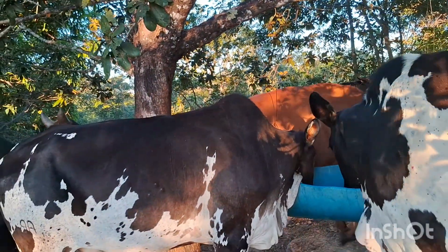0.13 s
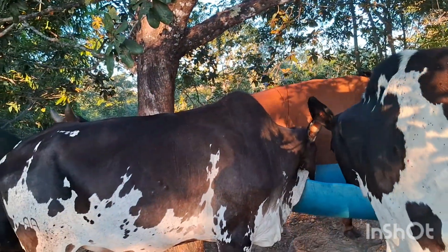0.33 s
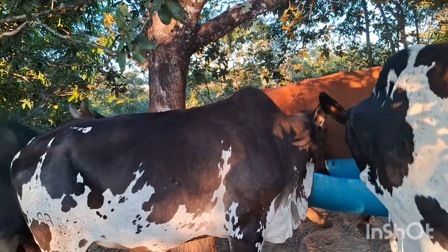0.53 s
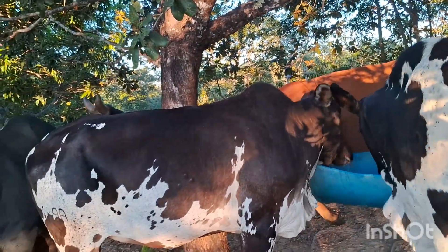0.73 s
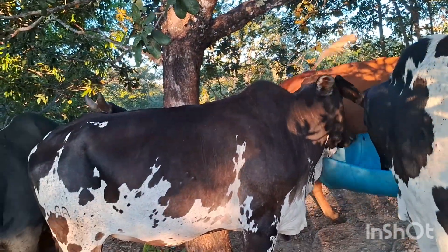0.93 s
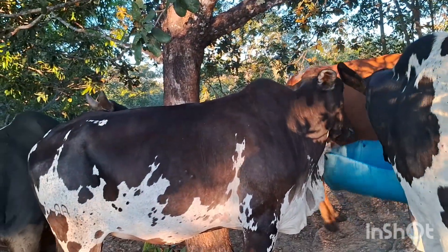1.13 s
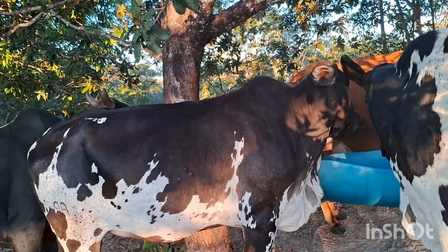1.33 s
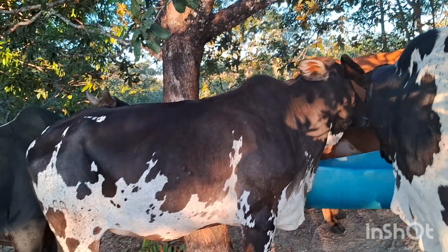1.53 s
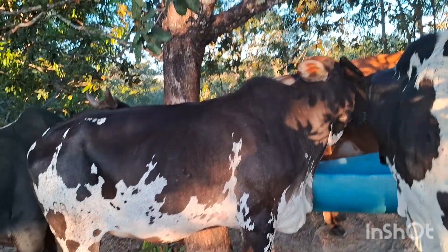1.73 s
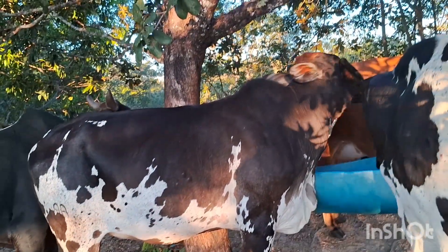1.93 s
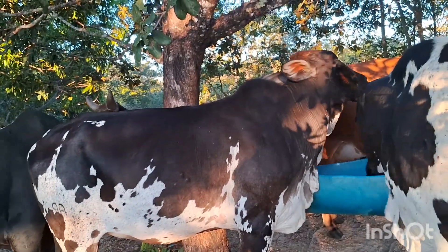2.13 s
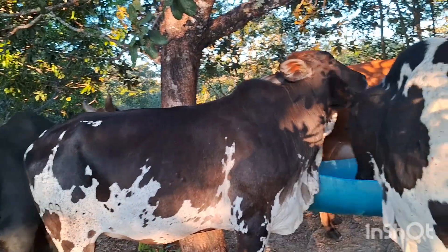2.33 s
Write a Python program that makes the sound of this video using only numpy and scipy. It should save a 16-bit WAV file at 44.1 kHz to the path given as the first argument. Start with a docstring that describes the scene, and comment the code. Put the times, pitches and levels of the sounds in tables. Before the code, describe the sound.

Cattle licking salt at a hollow plastic trough, heard close outdoors. Nearly quiet with faint ticks until 0.2 s; clustered knocks, clacks and gritty rasps at 0.25-0.55. Hard knocks at 0.8-0.85, then the densest rubbing, rumbling and crunching from 0.95 to 1.3, with a sharp crack at 1.04. Sparser licks follow, a hissing salt sweep at 1.77, a hollow knock at 2.0, then fading. Faint birds over soft air hiss.

```python
"""Cattle at a salt trough

Cattle crowd round a hollow plastic trough under trees. Knocks and rubbing excite its modes.
Tongues and muzzles rasp through coarse salt as random grains and pings; single crystals crack.
Mouths and hard knocks clack in paired resonances, tongues scrape, and heavy bodies thud as filtered noise.
Small birds twitter faintly as warbling glides over the coloured-noise hiss of the open pasture."""
import sys
import numpy as np
from scipy import signal
from scipy.fft import rfft, irfft
from scipy.io import wavfile
from scipy.ndimage import uniform_filter1d

SR = 44100
rng = np.random.default_rng(int(sys.argv[2]) if len(sys.argv) > 2 else 0)


def to_wav(s):
    """Save 16-bit WAV."""
    ch = np.atleast_2d(s).T  # columns
    pcm = np.round(np.clip(ch, -1, 1) * 32767)  # PCM
    wavfile.write(sys.argv[1], SR, pcm.astype(np.int16))


N = 103635
T = np.arange(N) / SR
HZ = np.maximum(np.fft.rfftfreq(N, 1 / SR), 1)
LEFT_LEAD_S, LEAD_ABOVE_HZ = 0.000391, 760  # the treble reaches the left ear first
EAR_GAP_RAD_PER_KHZ, EAR_GAP_MAX_RAD = 1.47, 1.74  # phase lead of the left ear


def from_db(db):
    """Logarithmic level: decibels become an amplitude gain."""
    return 10 ** (np.asarray(db) / 20)


def rms_one(x):
    """Normalisation: a signal is scaled to unit mean power."""
    return x / np.sqrt(np.mean(x ** 2) + 1e-20)


def in_time(rows):
    """Linear interpolation: straight lines join the rows of a control curve."""
    s, *columns = np.transpose(rows)
    return [np.interp(T, s, c) for c in columns]


def at_hz(points, hz=HZ):
    """Logarithmic pitch: a spectrum is interpolated on a log-frequency axis."""
    f, value = np.transpose(points)
    return np.interp(np.log(hz), np.log(f), value)


def colour(x, db):
    """Spectral shaping: a steady texture is weighted by frequency and held to unit power."""
    return rms_one(irfft(rfft(x) * from_db(db), N))


def even(x, size=700):
    """Envelope flattening: a texture is held at unit power over a moving window of samples."""
    return x / np.sqrt(uniform_filter1d(np.mean(x ** 2, axis=0), size) + 1e-12)


def strike(s, attack_s, decay_s):
    """Impact envelope: a straight rise precedes an exponential fall."""
    age = np.maximum(T - s, 0)
    fall_age = np.maximum(age - attack_s, 0)
    return np.minimum(age / attack_s, 1) * np.exp(-np.minimum(fall_age / decay_s, 50))


def drift(step_s):
    """Random modulation: joined random points wander with unit spread."""
    return rms_one(np.interp(T / step_s, np.arange(2000), rng.standard_normal(2000)))


def ear_phase(hz):
    """Interaural phase: a resonance reaches the left ear a little ahead of the right."""
    gap = np.minimum(EAR_GAP_RAD_PER_KHZ * hz / 1000, EAR_GAP_MAX_RAD)
    return gap * np.array([[.5], [-.5]])


# correlation of the two ears: frequency_hz [Hz], likeness [0 to 1]
EAR_LIKENESS = [(100, 0.9), (350, 1), (700, 0.45), (1300, 0.16), (3000, 0.04), (12000, 0.18)]
# balance of the two ears: frequency_hz [Hz], left_minus_right_db [dB]
EAR_BALANCE = [(100, 0), (700, 0), (1400, -3.5), (2800, -6.5), (5600, -1), (12000, 1.5)]


def spread(pair):
    """Interaural coherence: two unrelated textures become stereo, alike in the bass, apart in the treble."""
    mid, side = rfft(pair)
    alike, sign = np.clip(at_hz(EAR_LIKENESS), -.99, .99), np.array([[1], [-1]])
    lead = np.exp(1j * np.pi * sign * HZ * LEFT_LEAD_S / (1 + (LEAD_ABOVE_HZ / HZ) ** 2))
    ears = np.sqrt(1 + alike) * mid + sign * np.sqrt(1 - alike) * side
    return irfft(ears * lead * from_db(sign * at_hz(EAR_BALANCE) / 2), N)


def noise():
    """Broadband excitation: white noise is spread over the two ears."""
    return spread(rng.standard_normal((2, N)))


def grains(per_s, size_db, length_s):
    """Granular excitation: tiny random bursts of uneven size decay exponentially."""
    sizes = from_db(size_db * np.minimum(rng.exponential(1, N), 4)) * (rng.random(N) < per_s / SR)
    power = signal.lfilter([1], [1, -np.exp(-2 / (length_s * SR))], sizes ** 2 + 1e-12)
    return rms_one(np.sqrt(power) * noise())


# modes of the trough, before any muzzle damping: mode_hz [Hz], level_db [dB], t60_s [s]
TROUGH_MODES = [(110.1, -2.5, 0.32), (132.8, 2.5, 0.25), (175.5, -0.5, 0.32), (197.9, -1.5, 0.32),
                (253, -6.5, 0.1), (302, 0.5, 0.25), (345.6, 0, 0.21), (417.7, 2, 0.14), (491, 1, 0.17),
                (568, -8.5, 0.31), (641, -5.5, 0.32), (761, 3, 0.28), (838, -1.5, 0.084), (959, 2.5, 0.093),
                (1547, 1.5, 0.17), (1977, -5.5, 0.1)]


def trough(x, direct):
    """Modal resonance: contact passes partly straight to the air and partly through the trough's modes."""
    out = 0
    for k, (hz, db, t60) in enumerate(TROUGH_MODES):
        r, w = from_db(-60 / (t60 * SR)), 2 * np.pi * hz / SR
        feed = [(1 - r * r) / 2, 0, -(1 - r * r) / 2]
        mode = signal.lfilter(feed, [1, -2 * r * np.cos(w), r * r], x)
        out = out + (-1) ** k * from_db(db) * mode
    return out + direct * x


RING_WIDTH_OCT, MUZZLE_DAMPING, MODE_SPREAD_RAD = 0.61, 0.3, 0.39
MODES_DB, SCUFF_DB = -1.5, -6.5  # parts of the wall ring, relative to its table level
BOOM_DECAY_S = 0.019
# spectrum of the hollow boom: frequency_hz [Hz], density_db [dB per Hz]
BOOM_SPECTRUM = [(20, -46), (70, -1), (130, 1), (200, 7.5), (290, 2.5), (500, -49), (1200, -33.5)]
# spectrum of the hard clack: frequency_hz [Hz], density_db [dB per Hz]
CLACK_SPECTRUM = [(500, -54), (950, 0), (1500, 8), (1900, -3.5), (2300, -4), (3200, -32), (7000, -19)]
# knocks on the trough: start_s [s], boom_db [dB], wall_ring_db [dB, relative], ring_pitch_hz [Hz],
# clack_db [dB], contact_s [s]
KNOCK_EVENTS = [(0.053, -55.5, -45.5, 467, -42, 0.0053), (0.124, -60, -48, 410, -51, 0.012),
                (0.194, -45, -46.5, 327, -49.5, 0.0074), (0.24, -43.5, -40.5, 510, -59, 0.015),
                (0.275, -42, -38, 462, -39, 0.01), (0.293, -46, -41, 506, -42, 0.0081),
                (0.329, -63, -31, 524, -34, 0.0068), (0.357, -63, -25, 488, -43, 0.0055),
                (0.371, -31, -25.5, 384, -44, 0.011), (0.506, -53, -62, 400, -36.5, 0.004),
                (0.803, -47, -35, 440, -47, 0.017), (0.845, -43.5, -31.5, 417, -47, 0.007),
                (0.962, -48, -34.5, 493, -58, 0.017), (1.043, -43, -32, 410, -43, 0.0038),
                (1.101, -38.5, -33, 550, -38, 0.0067), (1.211, -38, -34, 335, -54, 0.0031),
                (2.002, -36, -31, 580, -46, 0.011)]


def knocks():
    """Impact excitation: each knock booms, scuffs and rings the wall around one pitch, and clacks."""
    white = noise()
    body = trough(white, direct=0.21)
    boom = even(colour(body, at_hz(BOOM_SPECTRUM)))
    clack = even(colour(body, at_hz(CLACK_SPECTRUM)), size=200)
    hz, db, t60 = np.transpose(TROUGH_MODES)[:, :, None]
    age, out = np.arange(SR // 4) / SR, np.zeros((2, N))
    for s, boom_db, ring_db, centre_hz, clack_db, contact_s in KNOCK_EVENTS:
        out += from_db(boom_db) * boom * strike(s, 0.0073, BOOM_DECAY_S)
        out += from_db(clack_db) * clack * strike(s, 0.00037, 1.02 * contact_s)

        scuff_db = -20 * np.log10(1 + (np.log2(HZ / centre_hz) / RING_WIDTH_OCT) ** 4)
        scuff = even(colour(white, scuff_db), size=250)
        out += from_db(ring_db + SCUFF_DB) * scuff * strike(s, 0.00069, 1.88 * contact_s)

        weight = from_db(db) / (1 + (np.log2(hz / centre_hz) / RING_WIDTH_OCT) ** 2)
        ear_scatter = MODE_SPREAD_RAD * (hz / 1000) ** 2 * rng.standard_normal((2, len(hz), 1))
        phase = rng.uniform(0, 2 * np.pi, hz.shape) + ear_scatter
        # the touching muzzle damps high modes and brief contacts most
        fall = from_db(-60 * age / t60) * np.exp(-age * MUZZLE_DAMPING / contact_s * hz / 600)
        modes = np.sum(weight * fall * np.sin(2 * np.pi * hz * age + phase), axis=1)
        ring = modes * np.minimum(age / 0.002, 1)
        start = int(s * SR)
        out[:, start:start + len(age)] += from_db(ring_db + MODES_DB) * ring / np.sqrt(np.sum(weight ** 2) / 2)
    return out


THUD_ATTACK_S, THUD_DECAY_S = 0.013, 0.027
# spectrum of a thud: frequency_hz [Hz], density_db [dB per Hz]
THUD_SPECTRUM = [(15, -42), (35, -29), (55, 4), (90, -3), (160, -11), (400, -46)]
# dull thuds of shifting weight: start_s [s], level_db [dB]
THUD_EVENTS = [(0.223, -43.5), (0.285, -46), (0.52, -57), (0.73, -50.5), (1.055, -47), (1.34, -56)]


def thuds():
    """Low-frequency impact: heavy bodies shift against the trough and the ground."""
    low = even(colour(noise(), at_hz(THUD_SPECTRUM)), size=1500)
    return low * sum(from_db(db) * strike(s, THUD_ATTACK_S, THUD_DECAY_S) for s, db in THUD_EVENTS)


# spectrum of the rubbing's rumble: frequency_hz [Hz], density_db [dB per Hz]
RUMBLE_SPECTRUM = [(15, -57), (55, -7.5), (130, 1.5), (230, 6.5), (320, -5), (600, -12), (1500, -27.5)]
# spectrum of the wall's rasp: frequency_hz [Hz], density_db [dB per Hz]
RASP_SPECTRUM = [(150, -20), (330, 2), (500, -3), (780, -10), (1150, -11), (1550, -11.5), (2200, -15.5),
                 (5000, -44)]
# hide and muzzles rubbing the trough: start_s [s], rumble_db [dB, relative], rasp_db [dB, relative]
RUB_CURVE = [(0, -73, -72), (.19, -70, -75), (.25, -57, -41), (.32, -56, -42.5), (.40, -39, -45.5),
             (.46, -40.5, -61), (.53, -56, -44), (.62, -68, -71), (.68, -48, -45.5), (.79, -48, -47),
             (.87, -52, -41), (.92, -51.5, -50), (.98, -39.5, -36), (1.06, -35, -40.5), (1.24, -39, -38.5),
             (1.30, -41, -47), (1.38, -56.5, -57.5), (1.47, -56.5, -52.5), (1.60, -58.5, -52.5),
             (1.74, -63, -64), (1.80, -53.5, -46.5), (1.87, -45.5, -52), (1.98, -51.5, -57.5),
             (2.06, -38.5, -50.5), (2.14, -53, -57.5), (2.25, -56.5, -66), (2.35, -102, -73)]


def rubbing():
    """Stick-slip friction: sticking and slipping hide shakes the trough."""
    rumble_db, rasp_db = in_time(RUB_CURVE)
    rumble = even(colour(trough(noise(), direct=0.5), at_hz(RUMBLE_SPECTRUM)), size=1500)
    slips = grains(per_s=260, size_db=2, length_s=0.0016)
    rasp = even(colour(trough(slips, direct=0.72), at_hz(RASP_SPECTRUM)), size=1800)
    return from_db(rumble_db - 3.5) * rumble + from_db(rasp_db - 2.0) * rasp


PINGS_PER_S, PING_SIZE_DB = 4200, 2.5
PING_DECAY_S, PING_SHORTENS_ABOVE_HZ = 0.0039, 6300  # low-pitch decay; small crystals ring more briefly


def pings(per_s=PINGS_PER_S, low_hz=700, high_hz=16000):
    """Damped resonance: crystals and wet films snap, each at a pitch of its own; flat on average."""
    rows = rng.random((int(per_s * N / SR), 5))
    age, out = np.arange(400) / SR, np.zeros((2, N + 400))
    for when, pitch, size, phase, turn in rows:
        hz, start = low_hz * (high_hz / low_hz) ** pitch, int(when * N)
        ears = 2 * np.pi * np.array([[phase], [phase + 0.66 * (turn - .5) - hz * LEFT_LEAD_S]])
        short = 1 + (hz / PING_SHORTENS_ABOVE_HZ) ** 2
        gain = from_db(PING_SIZE_DB * min(-np.log(size + 1e-9), 3.5)) * np.sqrt(hz * short)
        ring = np.sin(2 * np.pi * hz * age + ears) * np.exp(-age * short / PING_DECAY_S)
        out[:, start:start + len(age)] += gain * ring
    return rms_one(out[:, :N])


SALT_GRAINS_PER_S, PING_DB = 1500, -2
POPS_PER_S, POPS_DB = 170, -6.5  # sticky wet pops among the crystals
# spectrum of coarse salt: frequency_hz [Hz], density_db [dB per Hz]
SALT_SPECTRUM = [(60, -70), (500, -12.5), (1200, -3.5), (1850, -2), (2300, 0), (3300, -2), (5000, -2.5),
                 (7000, -4.5), (9200, -12), (12000, -8), (16000, -16)]
# tongues rasping over salt: start_s [s], level_db [dB, relative],
# brightness [nominal dB per octave, limited by the mix of two tilts]
LICK_CURVE = [(0, -64.5, -8), (.22, -55.5, 1), (.29, -46, -0.5), (.37, -45.5, -0.5), (.42, -51, -2),
              (.49, -48, -2.5), (.54, -43.5, -2), (.62, -60, -2), (.65, -52.5, -0.5), (.69, -45, -1.5),
              (.74, -47.5, 1), (.78, -60, 6), (.87, -49, -5), (.91, -51.5, 2.5), (.95, -42.5, -1.5),
              (1.01, -50, -0.5), (1.05, -35, -4), (1.08, -42.5, -3), (1.12, -42.5, -2), (1.29, -44, -3),
              (1.38, -53.5, -2.5), (1.42, -48.5, -4.5), (1.52, -51.5, -1), (1.605, -43, 0),
              (1.66, -54.5, -1), (1.75, -60, 3), (1.88, -47.5, -2.5), (1.95, -51.5, -3.5),
              (2.06, -58.5, -5), (2.14, -63, -7), (2.165, -49, 2), (2.25, -60.5, -3.5), (2.35, -56.5, -1.5)]


def licking():
    """Granular friction: rough tongues drag over many small crystals, and films of saliva pop."""
    db, bright = in_time(LICK_CURVE)
    grit = grains(per_s=SALT_GRAINS_PER_S, size_db=1.0, length_s=0.00076) + from_db(PING_DB) * pings()
    low, high = (colour(grit, at_hz(SALT_SPECTRUM) + tilt * np.log2(HZ)) for tilt in (-2, 2))
    share = np.clip(0.83 + bright / 4, 0, 1)  # of the brighter texture
    rasp = even((1 - share) * low + share * high, size=1500)
    pops = from_db(POPS_DB) * pings(POPS_PER_S, low_hz=748, high_hz=3103)
    return from_db(db) * (from_db(-2.5) * rasp + pops)


# hollow clacks of mouths, and hard knocks on the trough, each with two resonances:
# start_s [s], low_hz [Hz], low_db [dB], high_hz [Hz], high_db [dB], decay_s [s]
CLACK_EVENTS = [(0.295, 950, -38, 1600, -33.5, 0.0066), (0.310, 1155, -35, 1400, -33, 0.0079),
                (0.330, 980, -36, 1576, -31.5, 0.0071), (0.805, 862, -27.5, 2000, -36, 0.0071),
                (0.849, 581, -26.5, 2410, -38, 0.0095), (0.852, 1000, -34.5, 1465, -36, 0.0072),
                (1.101, 1060, -34, 1695, -30.5, .007), (1.160, 1460, -42, 2630, -41, .005),
                (1.212, 350, -28.5, 2410, -35, 0.006), (1.300, 1490, -31.5, 2780, -50, 0.0037),
                (2.003, 298, -29.5, 773, -29, 0.011)]


def clacks():
    """Paired resonances: each hollow clack rings briefly at two pitches of its own."""
    out = 0
    for s, low_hz, low_db, high_hz, high_db, decay_s in CLACK_EVENTS:
        ring = 0
        for hz, db in ((low_hz, low_db), (high_hz, high_db)):
            ring = ring + from_db(db) * np.sin(2 * np.pi * hz * (T - s) + ear_phase(hz))
        out = out + ring * strike(s, 0.00094, decay_s)
    return out


SLIPS_PER_S, MOUTH_Q = 500, 12.2  # Q at the starting pitch
# sticky scrapes in a moving mouth resonance: start_s [s], length_s [s], start_hz [Hz], end_hz [Hz],
# level_db [dB]
SCRAPE_EVENTS = [(0.268, 0.027, 1090, 910, -46), (0.362, 0.0214, 780, 626, -34.5),
                 (0.934, .026, 2240, 2200, -46.5), (0.956, 0.05, 570, 710, -36.5),
                 (1.031, .04, 2250, 2080, -43), (1.771, 0.087, 2280, 2380, -43.5)]


def scrapes():
    """Stick-slip resonance: a tongue's uneven jerks ring a pitch gliding with the mouth's opening."""
    out = np.zeros((2, N))
    for s, length, start_hz, end_hz, db in SCRAPE_EVENTS:
        span = (T >= s) & (T < s + length)
        slips = (rng.standard_normal(N) * ((rng.random(N) < SLIPS_PER_S / SR) + 0.023))[span]
        u = (T[span] - s) / length
        # a complex carrier moves the resonator along the glide
        turn = np.exp(2j * np.pi * np.cumsum(start_hz + (end_hz - start_hz) * u) / SR)
        ring = turn * signal.lfilter([1], [1, -np.exp(-np.pi * start_hz / MOUTH_Q / SR)], slips / turn)
        swell = np.sqrt(np.abs(np.sin(np.pi * u)))
        out[:, span] += from_db(db) * rms_one(np.real(ring * np.exp(1j * ear_phase(start_hz))) * swell)
    return out


SWEEP_S, SWEEP_DB = 1.766, -42.5
SWEEP_ATTACK_S, SWEEP_HOLD_S, SWEEP_RELEASE_S = 0.011, 0.08, 0.031
# spectrum of the muzzle's sweep: frequency_hz [Hz], density_db [dB per Hz]
SWEEP_SPECTRUM = [(60, -58), (400, -26), (1100, -8), (1500, -4.5), (1900, -4), (2300, -5.5), (2750, -8.5),
                  (3300, -8.5), (4400, -9), (7000, -11), (9500, -16.5), (13000, -14), (16000, -21)]


def sweep():
    """Dense granular flow: a muzzle's quick hissing pass through the salt swells, holds and dies."""
    age = T - SWEEP_S
    fall_age = np.maximum(age - SWEEP_ATTACK_S - SWEEP_HOLD_S, 0)
    shape = np.clip(age / SWEEP_ATTACK_S, 0, 1) * np.exp(-fall_age / SWEEP_RELEASE_S)
    grit = grains(per_s=3000, size_db=0.0, length_s=0.0008) + from_db(-5.5) * pings()
    return from_db(SWEEP_DB) * shape * even(colour(grit, at_hz(SWEEP_SPECTRUM)), size=1200)


CRACK_DECAY_S, CRACK_TAIL_S, CRACK_TAIL_DB = 0.0016, 0.011, -10
SNAP_DB = 4  # the first sharp edge of a crack, over its scatter
# salt crystals cracking: start_s [s], level_db [dB, relative],
# brightness [dB per octave, before a common tilt], pan_db [dB, left minus right]
CRACK_EVENTS = [(0.125, -32.5, 8.5, -0.5), (0.201, -40.5, 0.5, 3), (0.240, -31.5, -0.5, 2.5),
                (0.310, -40, -2, 2), (0.328, -33.5, -1.5, 2.5), (0.360, -33.5, -1, 5),
                (0.427, -40, -11, -3), (0.805, -33, -2, 4.5), (0.850, -35.5, -6, 0.5), (1.034, -35, 7, 6),
                (1.043, -26, 8.5, 3), (1.102, -31.5, -1.5, 0), (1.159, -37.5, 1, -2),
                (1.3007, -34.5, -1.5, 2.5), (1.340, -42, -0.5, 1), (1.544, -37, -5, 2),
                (1.5535, -33.5, -3, 3), (1.814, -37.5, -5.5, 5), (2.003, -36.5, -6, -3),
                (2.106, -44.5, -2, 0), (2.157, -41.5, -1.5, 1)]


def cracks():
    """Brittle fracture: each sharp snap is followed by a short scatter from the trough walls."""
    out, white = 0, noise()
    for s, db, bright, pan_db in CRACK_EVENTS:
        tone_db = at_hz(SALT_SPECTRUM) + (bright + 1.9) * np.log2(HZ)
        shape = strike(s, 0.00042, CRACK_DECAY_S)
        shape = shape + from_db(CRACK_TAIL_DB) * strike(s, 0.0052, CRACK_TAIL_S)
        arrival_s = s + LEFT_LEAD_S * np.array([[0], [1]])
        snap = irfft(from_db(tone_db) * 1j * np.exp(-2j * np.pi * HZ * arrival_s), N)
        crack = shape * colour(white, tone_db) + from_db(SNAP_DB) * snap / np.abs(snap).max()
        out = out + from_db(db + pan_db * np.array([[.5], [-.5]])) * crack
    return out


BIRDS_DB, FOLIAGE_DB = -4, 1  # direct and scattered song
WARBLE_HZ, BIRD_FLICKER_DB = 40, 2.5  # typical random deviations of pitch and level
# far bird notes: start_s [s], length_s [s], start_hz [Hz], end_hz [Hz], level_db [dB, relative]
BIRD_NOTES = [(0.072, 0.024, 4400, 4700, -57), (0.10, 0.05, 3080, 2950, -54),
              (0.162, 0.04, 4680, 4360, -56), (.184, 0.046, 3100, 2980, -55),
              (0.885, 0.035, 3000, 3200, -53), (0.90, 0.042, 4500, 4700, -52),
              (0.938, 0.06, 3060, 2900, -50), (0.955, 0.07, 4550, 4300, -53),
              (1.162, .035, 4200, 4100, -52), (1.40, 0.03, 3020, 2850, -54), (1.455, 0.05, 3120, 2950, -54),
              (2.025, 0.07, 2950, 3170, -53), (2.128, 0.028, 2880, 3300, -57),
              (2.158, 0.035, 2620, 2540, -56), (2.193, 0.03, 2600, 2950, -55),
              (2.303, 0.035, 2900, 2660, -54)]


def birds():
    """Frequency modulation and scattering: short warbling glides are blurred by the foliage."""
    song, warble = np.zeros(N), WARBLE_HZ * drift(0.0064)
    for s, length, start_hz, end_hz, db in BIRD_NOTES:
        u = np.clip((T - s) / length, 0, 1)
        swell = np.abs(np.sin(np.pi * u)) ** 0.31
        pitch_hz = start_hz + (end_hz - start_hz) * u + warble
        song += from_db(db) * swell * np.sin(2 * np.pi * np.cumsum(pitch_hz) / SR)
    song *= from_db(BIRD_FLICKER_DB * drift(0.0055))
    leaves = rng.standard_normal((2, N)) * strike(.002, 0.0024, 0.0053)
    leaves = leaves / np.sqrt(np.sum(leaves ** 2) / 2)
    scattered = signal.fftconvolve(song[None], leaves)[:, :N]
    return from_db(BIRDS_DB) * song + from_db(FOLIAGE_DB) * scattered


AIR_DB = -57
# spectrum of the open pasture: frequency_hz [Hz], density_db [dB per Hz]
AIR_SPECTRUM = [(20, -26), (70, 1.5), (200, -4.5), (400, 0), (900, -11.5), (2400, -3.5), (4500, -3.5),
                (8000, -19.5), (16000, -16)]


def pasture():
    """Stationary noise: a steady coloured hiss stands for the open pasture."""
    return from_db(AIR_DB) * colour(noise(), at_hz(AIR_SPECTRUM))


def scene():
    """Superposition: the trough, the salt and the pasture behind add together."""
    trough_contacts = knocks() + thuds() + rubbing() + clacks()
    salt_and_mouths = licking() + scrapes() + sweep() + cracks()
    return trough_contacts + salt_and_mouths + birds() + pasture()


MIC_HIGH_PASS_HZ, CUTOFF_HZ = 42, 15900


def record(dry):
    """Band limiting: the small microphone loses the deepest bass; the top is cut steeply."""
    thin = signal.sosfilt(signal.butter(2, MIC_HIGH_PASS_HZ, "high", fs=SR, output="sos"), dry)
    return signal.sosfilt(signal.ellip(12, .2, 80, CUTOFF_HZ, fs=SR, output="sos"), thin)


dry = scene()
out = record(dry)
to_wav(out)
```